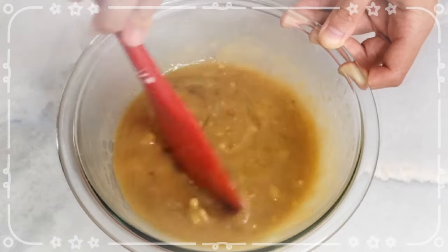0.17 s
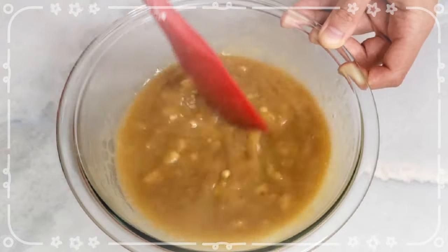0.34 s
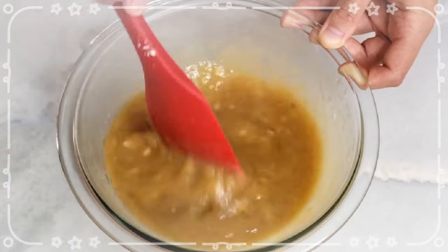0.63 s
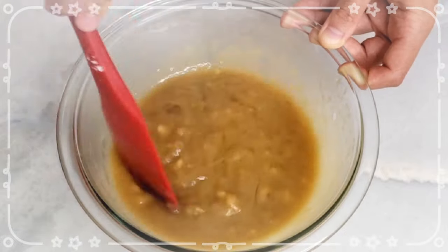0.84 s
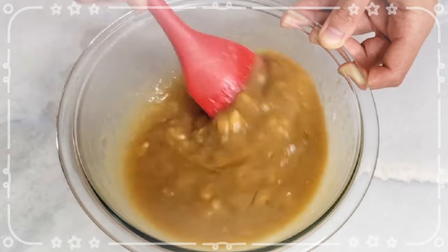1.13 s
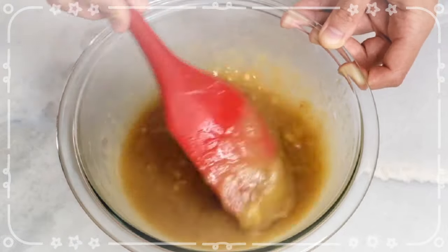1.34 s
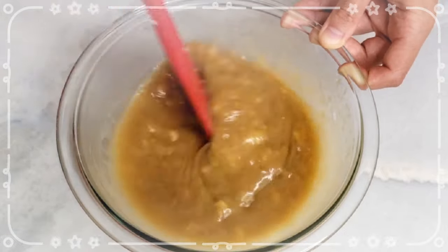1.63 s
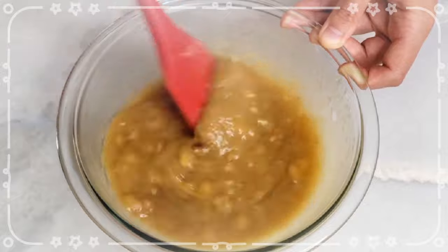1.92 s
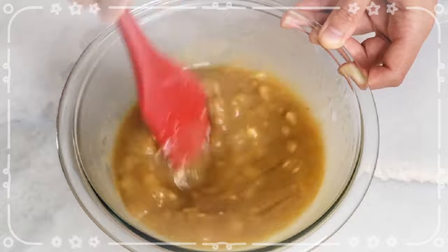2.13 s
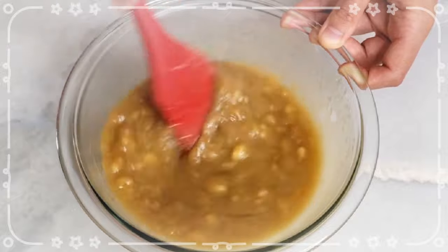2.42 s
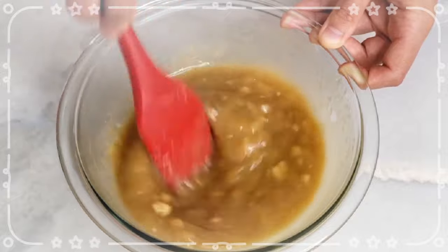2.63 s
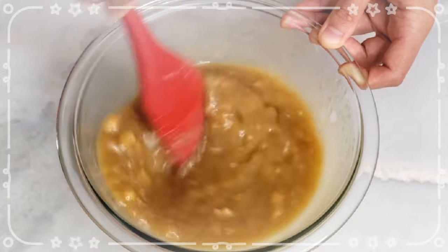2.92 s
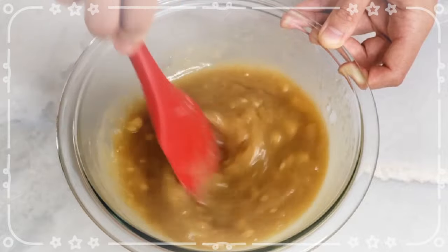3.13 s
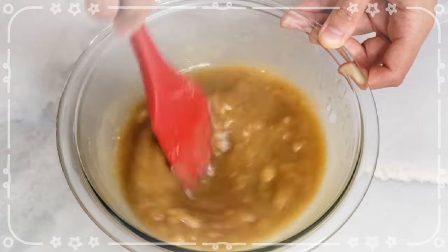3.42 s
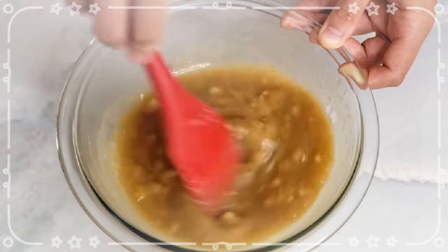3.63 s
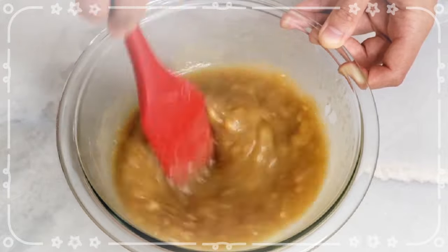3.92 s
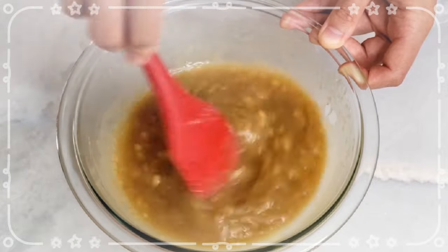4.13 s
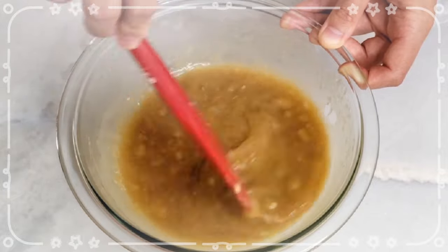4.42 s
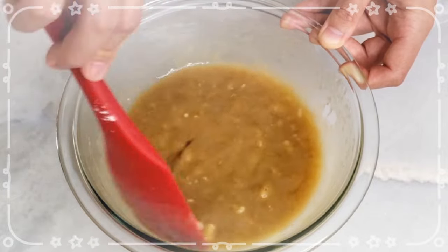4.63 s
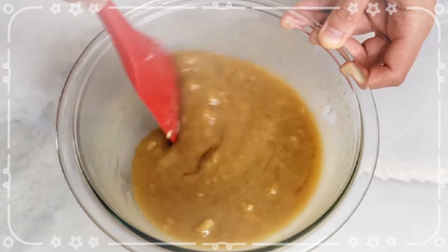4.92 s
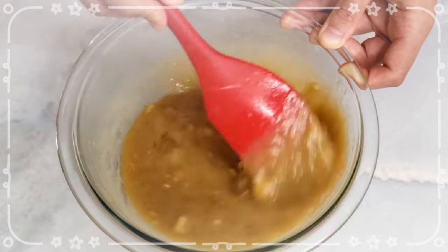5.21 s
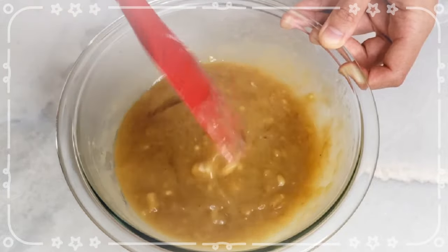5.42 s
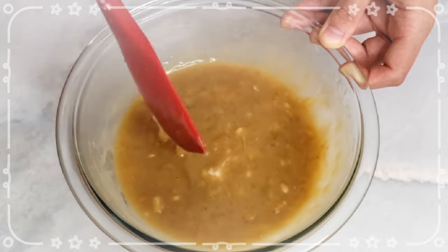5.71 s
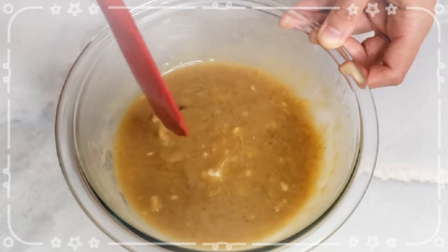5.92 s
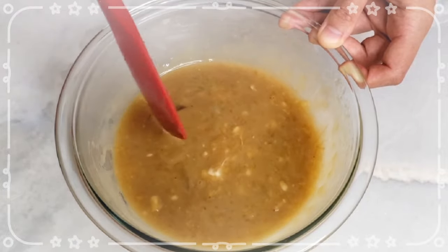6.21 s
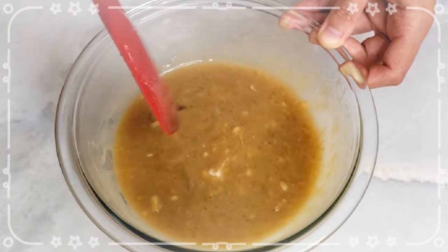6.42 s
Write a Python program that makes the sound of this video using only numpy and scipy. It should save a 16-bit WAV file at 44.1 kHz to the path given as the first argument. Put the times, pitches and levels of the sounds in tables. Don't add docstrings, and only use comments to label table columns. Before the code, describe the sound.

A spatula works batter in a glass bowl in a small kitchen, heard close. Two very faint bottom taps, a clear double knock on the wall, then sparse tiny bubble snaps over almost nothing. Past the middle come a light tip click and a strong flat slap. Near the end, three quick double raps on the rim ring dull glass and thump the worktop, each softer.

```python
import sys
import numpy as np
from scipy import signal
from scipy.fft import rfft, irfft, next_fast_len
from scipy.io import wavfile
from scipy.ndimage import uniform_filter1d, minimum_filter1d

SR = 44100
rng = np.random.default_rng(int(sys.argv[2]) if len(sys.argv) > 2 else 0)


def gain_from_db(level_db):
    decades = np.asarray(level_db, float) / 20
    return 10 ** decades


def to_wav(s):
    ch = np.atleast_2d(s).T
    pcm = np.round(np.clip(ch, -1, 1) * 32767)
    wavfile.write(sys.argv[1], SR, pcm.astype(np.int16))


N = 289296

# freq_hz, density_db_per_hz
AIR = [(15, -32.5), (30, -27.5), (50, -11.5), (100, -14.5), (140, -13.5), (190, -24.5), (250, -18.5),
       (450, -22), (600, -25.5), (1000, -31.5), (1700, -39.5), (3000, -52.5), (6000, -58.5), (16000, -67.5)]
# freq_hz, rms_db
FRIDGE_HUM = [(120, -67), (1484, -102), (1722, -100)]
# freq_hz, width_hz, rms_db
DRONE = [(53, 5.9, -82), (93, 8.2, -79), (233, 12, -85), (322, 5.5, -88), (468, 23, -83.5)]
# delay_s, level_db
ECHOES = [
    (.0031, -14.5),
    (.0072, -12.5),
    (.016, -19.5),
]
# freq_hz, t60_s
ROOM = [(150, .2), (500, 0.31), (1400, 0.29), (3700, 0.28), (9000, 0.098), (15000, 0.15)]
# start_s, snap_db, ring_hz, ring_db
POPS = [(1.434, -47.5, 5000, -15.5), (1.445, -46, 4460, -13.5), (1.5259, -50, 3559, 4),
        (1.5254, -50, 4488, 6), (1.525, -48, 6400, 5.5), (1.913, -44.5, 9210, -12),
        (2.046, -47, 6028, -10.5), (2.323, -54.5, 4900, -16), (2.832, -41, 4983, -3.5),
        (2.965, -43.5, 2516, -15.5), (3.107, -45, 12050, -9), (3.763, -46, 4530, -17.5),
        (3.797, -52.5, 9000, -17), (4.587, -52, 12800, 6), (4.588, -55.5, 14700, 6.5),
        (4.767, -49.5, 9670, 3), (4.769, -52, 11240, 2)]
# freq_hz, level_db
SNAP = [(500, 24), (1000, 27.5), (1700, 25.5), (3000, 15), (6000, 9), (11000, 5.5), (16000, -4)]
# freq_hz, first_landing_db, second_landing_db, t60_s
WORKTOP = [(90, -15, -41.5, 0.1), (140, -14.5, -31, 0.17), (193.1, -7.5, -23, 0.063),
           (246.7, -33, -25, 0.065), (320.3, -31, -17.5, 0.058), (455, -28.5, -18.5, 0.053)]
BLOWS = {"floor": [(.501, -39.5, .014, -60.5), (.874, -34, .017, -43.5)],
         "wall": [(1.0072, -15.5, 0.01, -23)], "tip": [(3.6207, -27, 0.00044, 0)],
         "slap": [(3.8751, -8.5, 0.0015, 0)], "rim": [(5.847, -3, .015, -1), (6.041, -7.5, .0127, -3),
         (6.233, -11.5, .0107, -5)]}
# freq_hz, level_db, t60_s
BOWL = [(306, -4, 0.029), (603, -2, 0.025), (751, 0.5, 0.032), (848, 1, 0.046), (934, 0, .03),
        (997, 1.5, 0.028), (1252.7, 5, 0.016), (1288, 1.5, 0.026), (1480, 5, 0.017), (1712, 2, 0.027),
        (1930, 1, 0.012), (1904, 4, 0.016), (2172, -2.5, 0.012), (2480, 0, 0.031),
        (2770, -5.5, 0.0027), (3240, -4.5, 0.022), (5060, -2.5, 0.021), (7970, 2, .012), (8080, 0, .015),
       (8400, 6, 0.015), (8860, 2, 0.021), (12300, 0, .01)]
# freq_hz, level_db
GLASS = [(880, 0.94), (1100, -5.5), (1280, 0.35), (5200, -1.16), (6600, -9), (8500, 12.5), (10500, -3),
         (13000, 0.98)]
# freq_hz, density_db_per_hz
FLOOR = [(430, -29.5), (640, -5.5), (700, -3.5), (890, -1.5), (1150, -16), (3000, -34), (6000, -66.5)]
# freq_hz, density_db_per_hz
WALL = [(450, -44.5), (660, -3.5), (1000, 4), (1950, -5), (2230, -14), (2530, -12.5), (3100, -29.5),
        (14000, -59.5)]
# freq_hz, density_db_per_hz
TIP = [(1590, -42), (1740, -2), (2520, -7.5), (2890, -41.5), (3490, -12.5), (6150, -18.5), (13500, -35.5),
       (16000, -49.5)]
# freq_hz, density_db_per_hz
SLAP = [(520, -27), (740, 0), (900, -12), (2400, -15), (2950, -29), (3700, -21.5), (12000, -31.5),
        (16000, -54)]
# freq_hz, density_db_per_hz
RIM = [(70, -38.5), (420, -18), (640, -4), (1500, -3.5), (2500, -13), (3300, -21), (12500, -45.5),
       (16000, -67.5)]
PLACES = {"floor": (FLOOR, 0.64, -2.3, -8), "wall": (WALL, 1.3, -2, -6), "tip": (TIP, 0.51, -11, -10.5),
          "slap": (SLAP, .2, -0.5, -12.5), "rim": (RIM, 1.3, -1.5, -7)}

AIR_DB = -75
POP_ROOM_DB, THUD_ROOM_DB = -8.5, -6
POP_CYCLES, CAVITY_DB = 40, -3
WORKTOP_DB_PER_FORCE_DB = 1.2
TICK_DB, TICK_TILT_DB_PER_OCT = -7.5, 5
WEIGHT_S, SECOND_WEIGHT_S = .003, .0018
REBOUND_DB, REBOUND_S, LANDING_RING_DB = -7.5, .0075, 6.5
CRACK_DB, CRACK_T60_S, CRACK_SPREAD = 32.5, .003, .45
CUT_DB = 31
OPEN_DB, KNEE_DB = 10, 2
ATTACK_S, RELEASE_S = 0.05, 0.16
HISS_DB = -96


def rms_one(x):
    return x / np.sqrt(np.mean(x ** 2) + 1e-30)


def at_hz(points, hz):
    table = np.array(points)
    return np.interp(np.log(np.maximum(hz, 1)), np.log(table[:, 0]), table[:, 1])


def coloured(x, points):
    size = next_fast_len(2 * len(x))
    gain = gain_from_db(at_hz(points, np.fft.rfftfreq(size, 1 / SR)))
    cepstrum = irfft(np.log(gain), size)
    cepstrum[1:size // 2] *= 2
    cepstrum[size // 2 + 1:] = 0
    return irfft(rfft(x, size) * np.exp(rfft(cepstrum)), size)[:len(x)]


def add(track, sound, start_s):
    i = round(start_s * SR)
    track[i:i + len(sound)] += sound[:len(track) - i]


def background():
    t = np.arange(N) / SR
    size = next_fast_len(N)
    colour = gain_from_db(at_hz(AIR, np.fft.rfftfreq(size, 1 / SR)))
    air = irfft(rfft(rng.standard_normal(size)) * colour, size)[:N]
    out = gain_from_db(AIR_DB) * rms_one(air)
    for hz, width_hz, db in DRONE:
        radius = np.exp(-np.pi * width_hz / SR)
        poles = [1, -2 * radius * np.cos(2 * np.pi * hz / SR), radius * radius]
        drone = signal.lfilter([1, 0, -1], poles, rng.standard_normal(N + SR))
        out += gain_from_db(db) * rms_one(drone[SR:])
    for hz, db in FRIDGE_HUM:
        out += gain_from_db(db) * np.sqrt(2) * np.sin(2 * np.pi * hz * t)
    return gain_from_db(CUT_DB) * out


def kitchen(direct, sent):
    t = np.arange(SR // 2) / SR
    edges_hz = 60 * 2 ** np.arange(0, 8.3, .5)
    tail = np.zeros(len(t))
    for low, high in zip(edges_hz, edges_hz[1:]):
        sos = signal.butter(2, [low, high], "band", fs=SR, output="sos")
        band = signal.sosfilt(sos, rng.standard_normal(len(t)))
        tail += band * gain_from_db(-60 * t / at_hz(ROOM, low))
    tail *= 1 - np.exp(-t / 0.00085)
    tail /= np.sqrt(np.sum(tail ** 2))
    out = direct + signal.fftconvolve(sent, tail)[:N]
    for delay_s, db in ECHOES:
        add(out, gain_from_db(db) * direct, delay_s)
    return out


def pops():
    out = np.zeros(N)
    t = np.arange(SR // 20) / SR
    snap = coloured(1. * (t == 0), SNAP)
    for start_s, snap_db, hz, ring_db in POPS:
        decay = gain_from_db(CAVITY_DB + ring_db - 60 * t * hz / POP_CYCLES)
        ring = decay * np.sin(2 * np.pi * hz * t)
        add(out, gain_from_db(snap_db) * (rng.choice([-1, 1]) * snap + ring), start_s)
    return out


def thuds():
    out = np.zeros(N)
    t = np.arange(8192) / SR
    hz, first_db, second_db, t60_s = np.transpose(WORKTOP)[:, :, None]
    modes = gain_from_db(-60 * t / t60_s) * np.tanh(t * hz) * np.sin(2 * np.pi * hz * t)
    for start_s, force_db, gap_s, again_db in BLOWS["rim"]:
        first = gain_from_db(first_db + WORKTOP_DB_PER_FORCE_DB * force_db) * modes
        second = gain_from_db(second_db + WORKTOP_DB_PER_FORCE_DB * again_db) * modes
        add(out, np.sum(first, axis=0), start_s)
        add(out, np.sum(second, axis=0), start_s + gap_s)
    return out


def contacts(start_s, force_db, gap_s, again_db):
    if gap_s < .005:
        return [(start_s, force_db, 0, 0)]
    late, bounce = rng.uniform(.8, 1.3, size=2)
    again_s = start_s + gap_s
    return [(start_s, force_db + TICK_DB, TICK_TILT_DB_PER_OCT, 0),
            (start_s + WEIGHT_S, force_db, 0, 0),
            (again_s, again_db + TICK_DB, TICK_TILT_DB_PER_OCT, 0),
            (again_s + late * SECOND_WEIGHT_S, again_db, 0, LANDING_RING_DB),
            (again_s + bounce * REBOUND_S, again_db + REBOUND_DB, 0, 0)]


def glass_touch(place, force_db, tilt_db, more_ring_db):
    colour, sheen, ring_db, _ = PLACES[place]
    t = np.arange(4096) / SR
    hz, level_db, t60_s = np.transpose(BOWL)[:, :, None]
    sign = (-1.) ** np.arange(len(hz))[:, None]
    strength = sign * gain_from_db(level_db + 1.4 * rng.standard_normal(hz.shape))
    decay = gain_from_db(ring_db + more_ring_db - 60 * t / t60_s)
    ring = np.sum(strength * np.sin(2 * np.pi * hz * t) * decay, axis=0)
    burst = (t == 0) + CRACK_SPREAD * rng.standard_normal(len(t))
    crack = gain_from_db(CRACK_DB - 60 * t / CRACK_T60_S) * burst
    glass = [(f, sheen * db + tilt_db * np.log2(f / 1000)) for f, db in GLASS]
    sound = coloured(coloured(ring + crack, colour), glass)
    return sound * gain_from_db(force_db) / np.abs(sound).max()


def knocks():
    direct, sent = np.zeros(N), np.zeros(N)
    for place, (_, _, _, room_share_db) in PLACES.items():
        for blow in BLOWS[place]:
            for start_s, force_db, tilt_db, more_ring_db in contacts(*blow):
                sound = glass_touch(place, force_db, tilt_db, more_ring_db)
                add(direct, sound, start_s)
                add(sent, gain_from_db(room_share_db) * sound, start_s)
    push = thuds()
    return direct + push, sent + gain_from_db(THUD_ROOM_DB) * push


def scene():
    direct, sent = knocks()
    bursts = pops()
    room = kitchen(direct + bursts, sent + gain_from_db(POP_ROOM_DB) * bursts)
    return (room + background())[None]


def suppress(x):
    frames = signal.stft(x, nperseg=2048, noverlap=1792)[2]
    power = uniform_filter1d(np.abs(frames) ** 2, size=5, axis=0)
    usual = np.median(power[:, ::8], axis=1, keepdims=True)
    over_db = 10 * np.log10(power / usual + 1e-12)
    opened = 1 / (1 + np.exp(np.clip((OPEN_DB - over_db) / KNEE_DB, -40, 40)))
    t = np.arange(opened.shape[1]) * 256 / SR
    closing, opening = t / RELEASE_S, t / ATTACK_S
    opened = np.maximum.accumulate(opened + closing, axis=1) - closing
    backwards = (opened - opening)[:, ::-1]
    opened = np.maximum.accumulate(backwards, axis=1)[:, ::-1] + opening
    opened = -minimum_filter1d(-opened, size=3, axis=0)
    opened = uniform_filter1d(opened, size=7, axis=0)
    gain = gain_from_db(-CUT_DB * (1 - opened))
    return signal.istft(frames * gain, nperseg=2048, noverlap=1792)[1][:N]


def low_pass(x):
    return signal.sosfilt(signal.butter(12, 16340, fs=SR, output="sos"), x)


def record(dry):
    clean = suppress(dry[0]) + gain_from_db(HISS_DB) * rng.standard_normal(N)
    return low_pass(clean[None])


dry = scene()
out = record(dry)
to_wav(out)
```